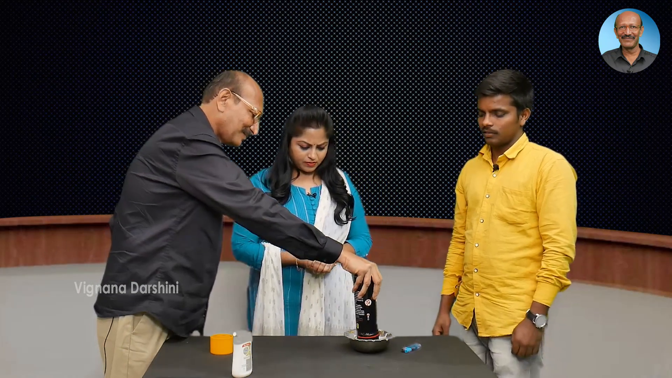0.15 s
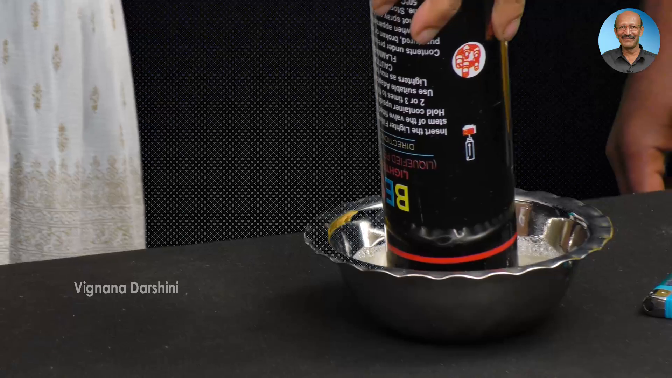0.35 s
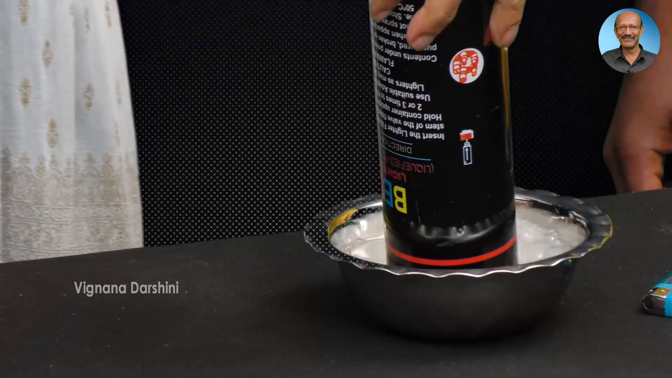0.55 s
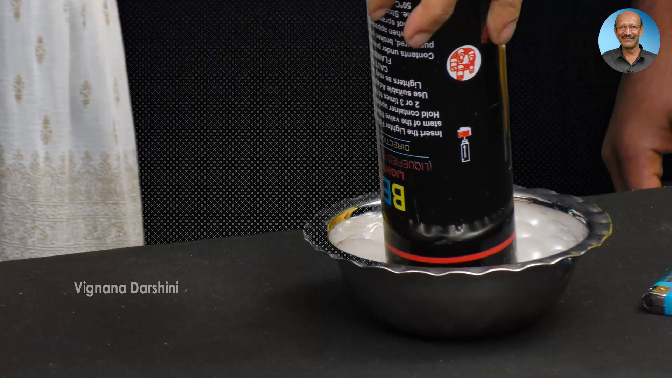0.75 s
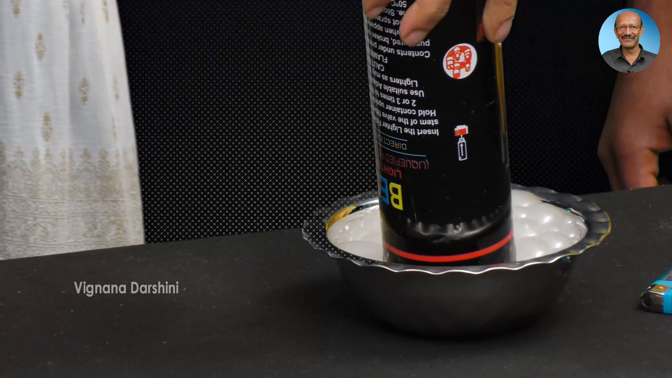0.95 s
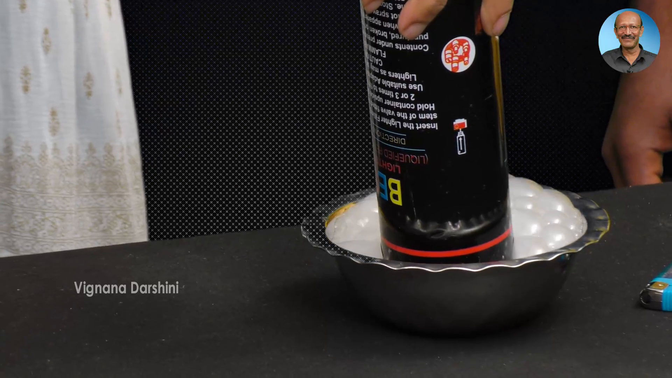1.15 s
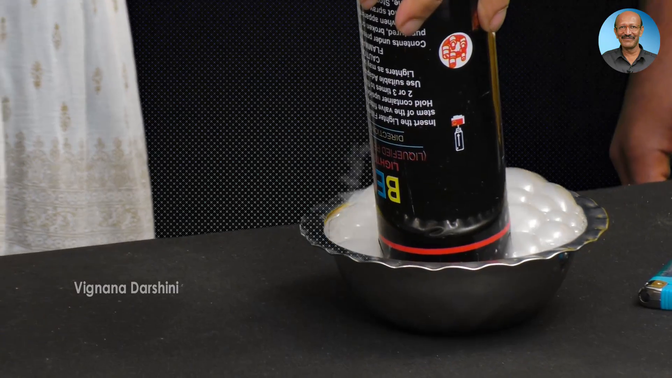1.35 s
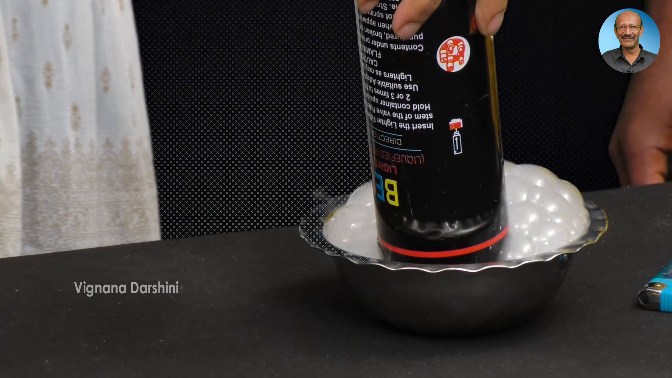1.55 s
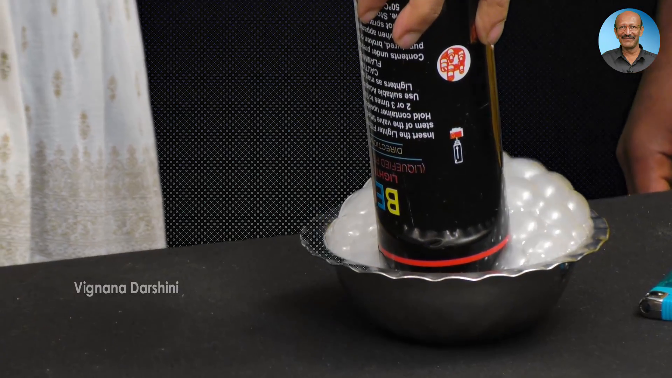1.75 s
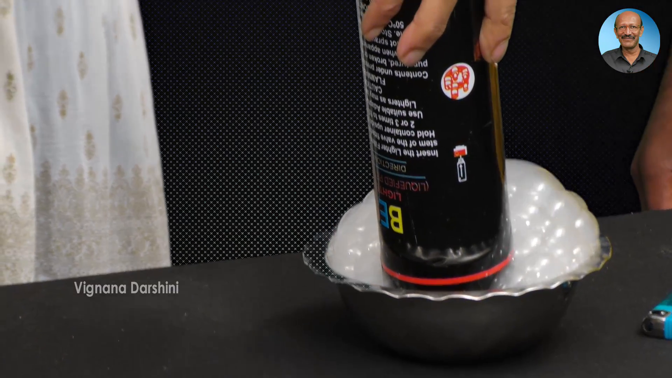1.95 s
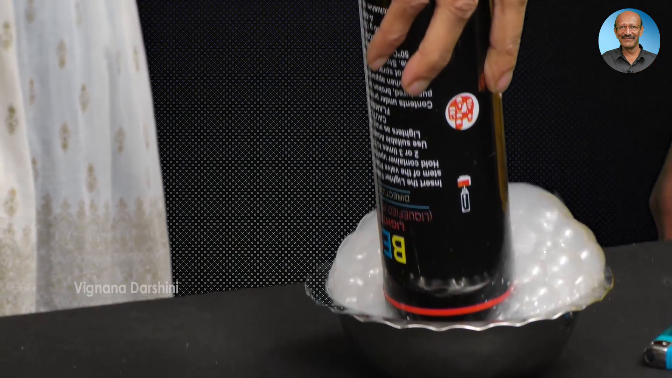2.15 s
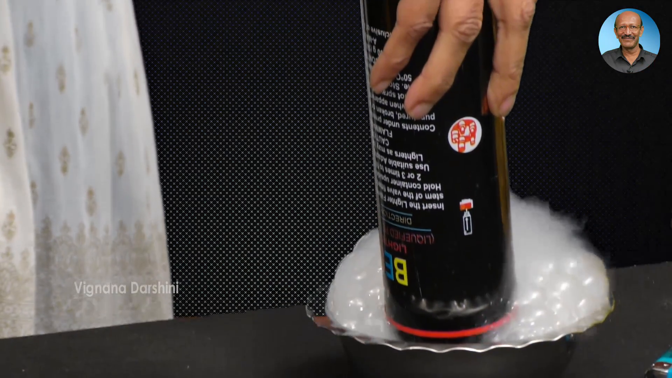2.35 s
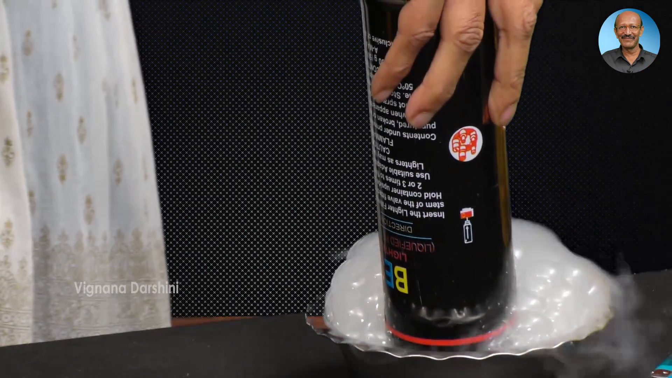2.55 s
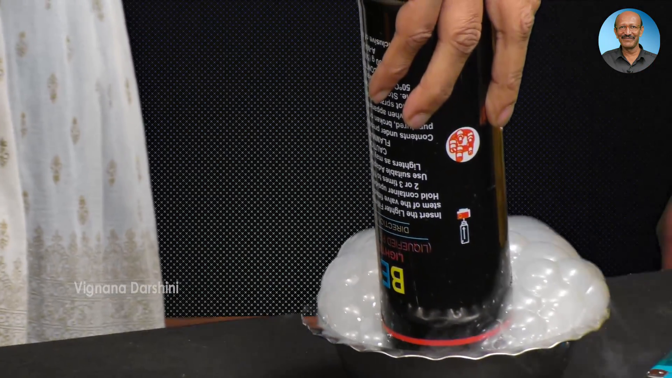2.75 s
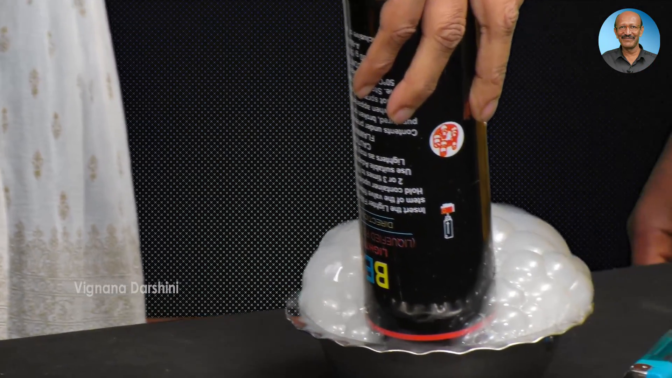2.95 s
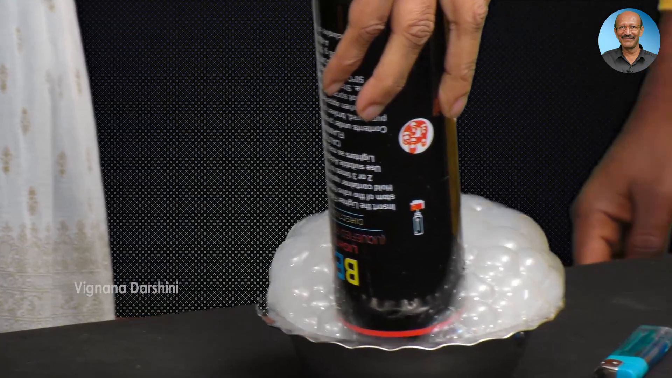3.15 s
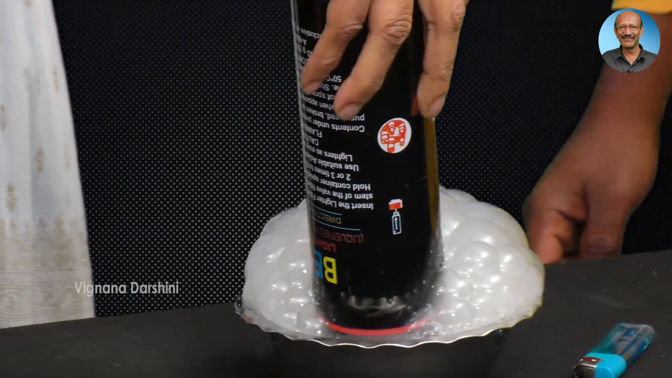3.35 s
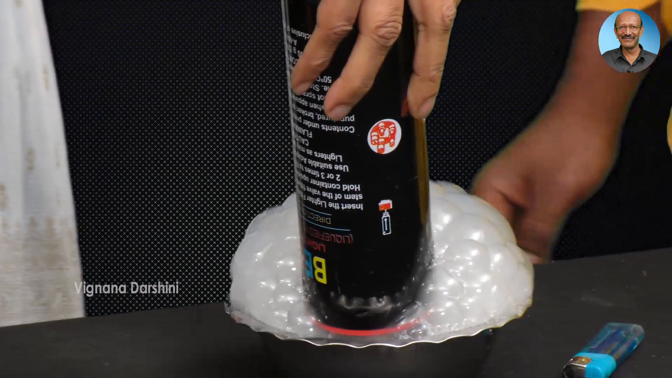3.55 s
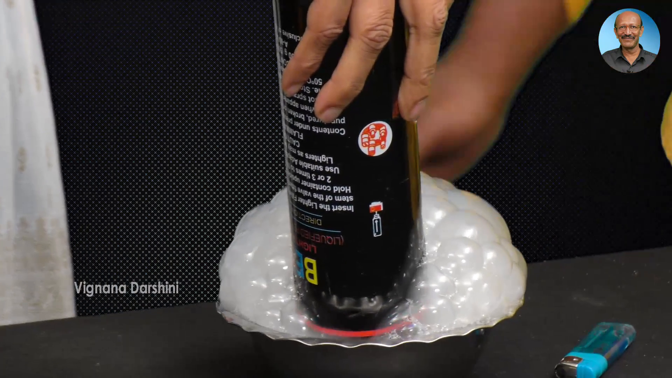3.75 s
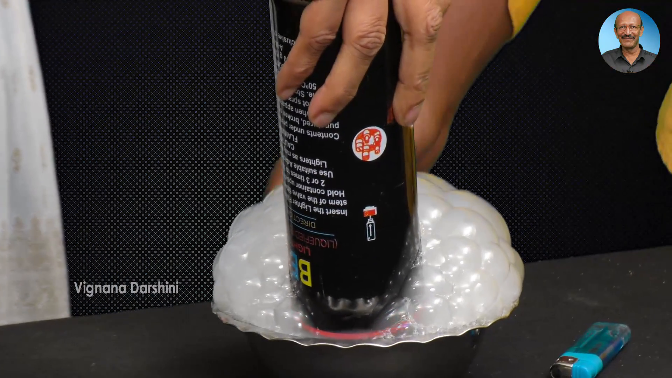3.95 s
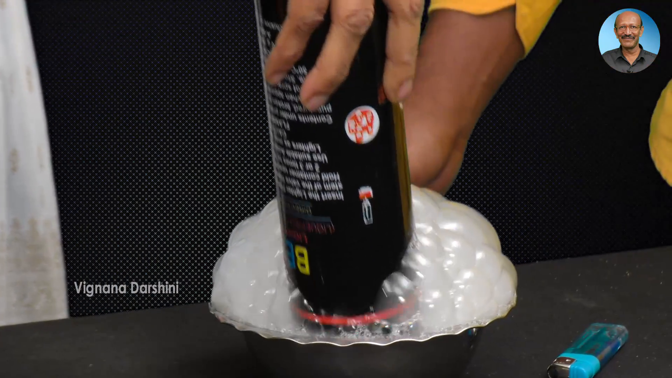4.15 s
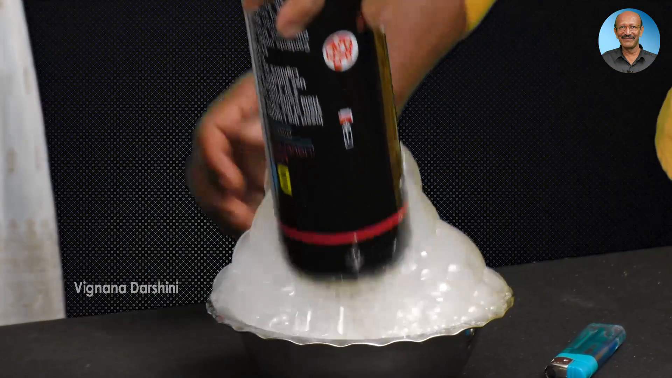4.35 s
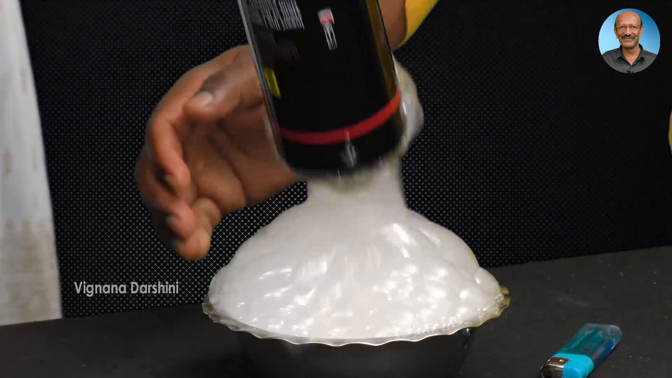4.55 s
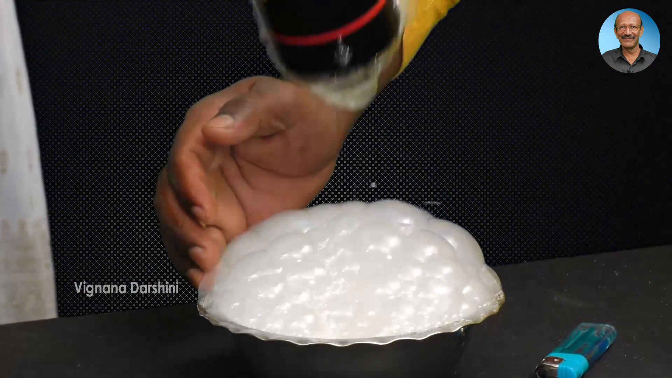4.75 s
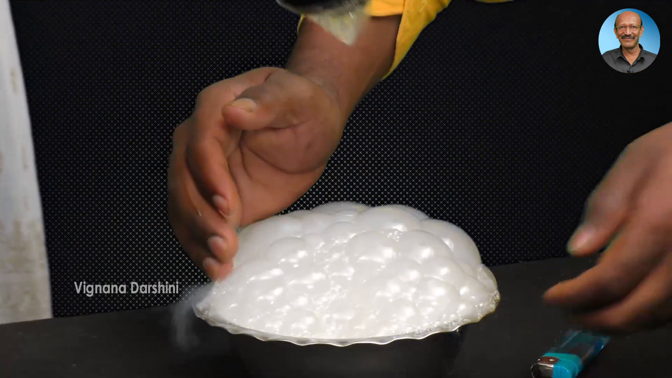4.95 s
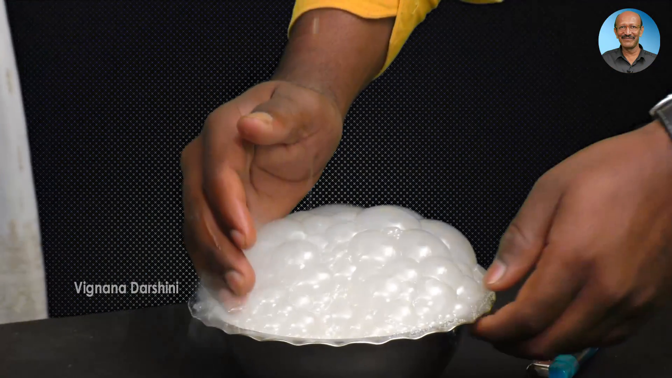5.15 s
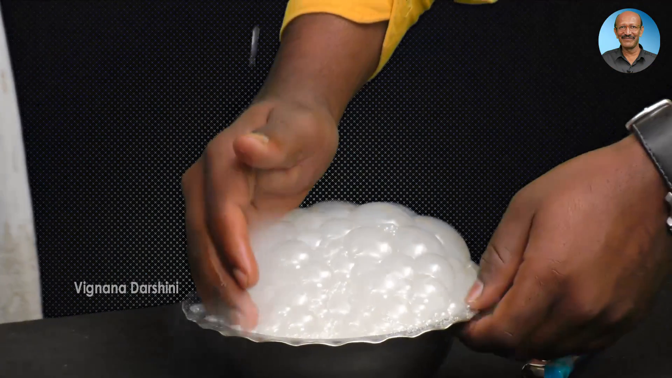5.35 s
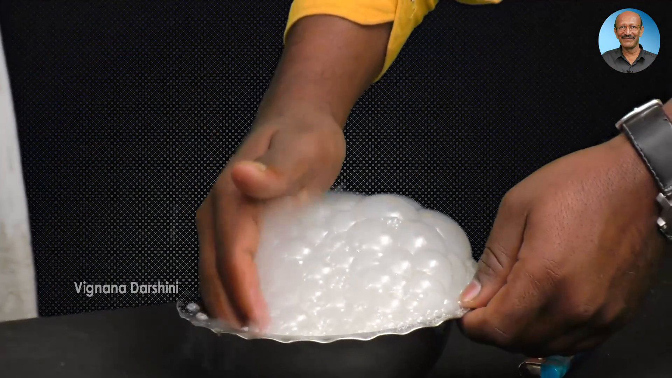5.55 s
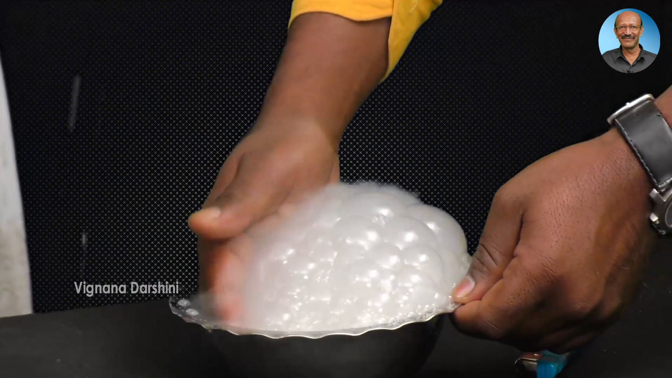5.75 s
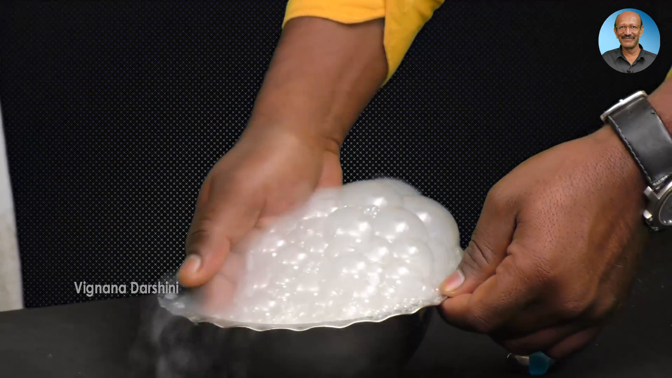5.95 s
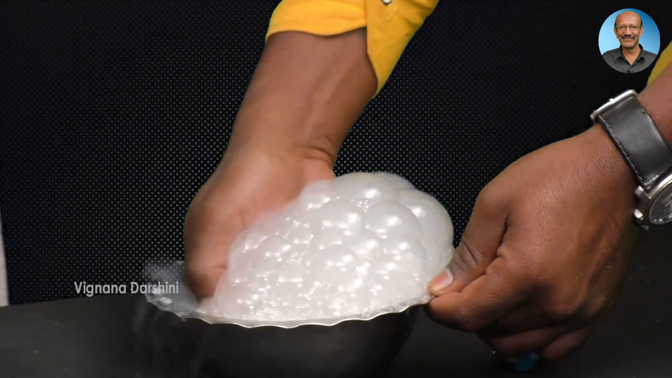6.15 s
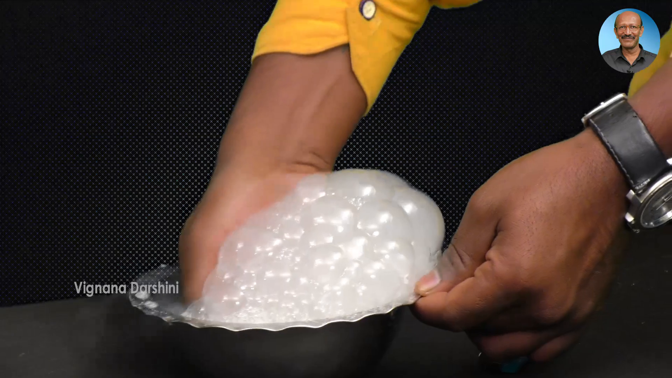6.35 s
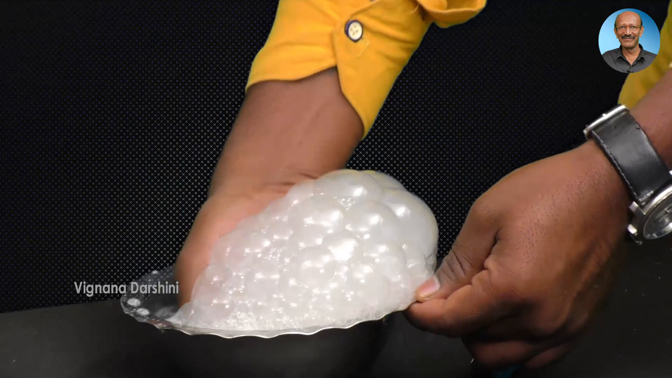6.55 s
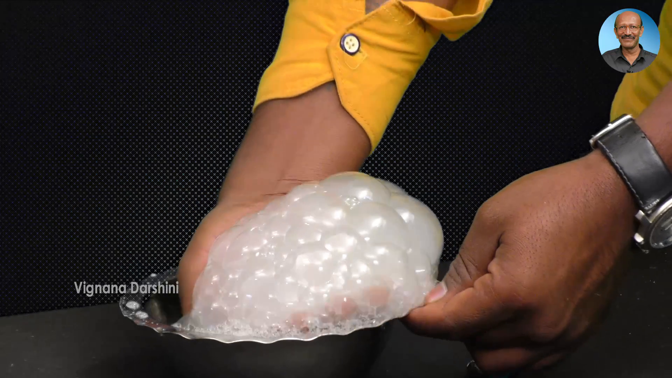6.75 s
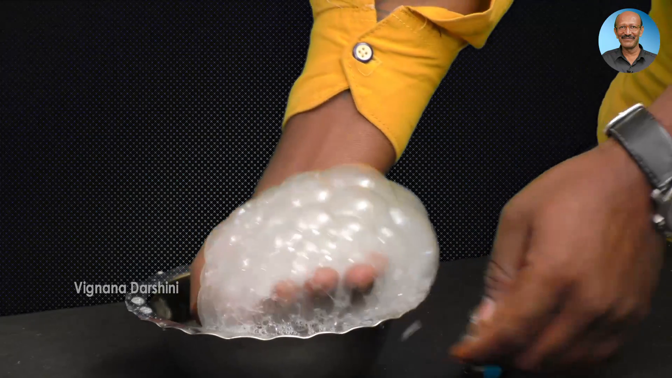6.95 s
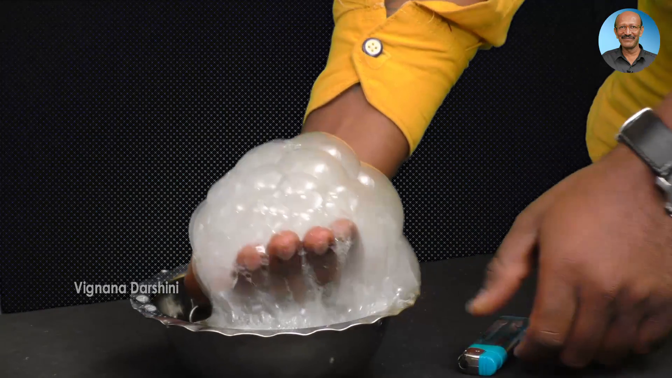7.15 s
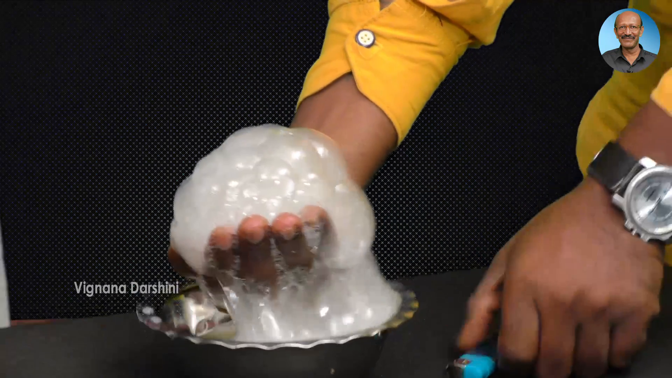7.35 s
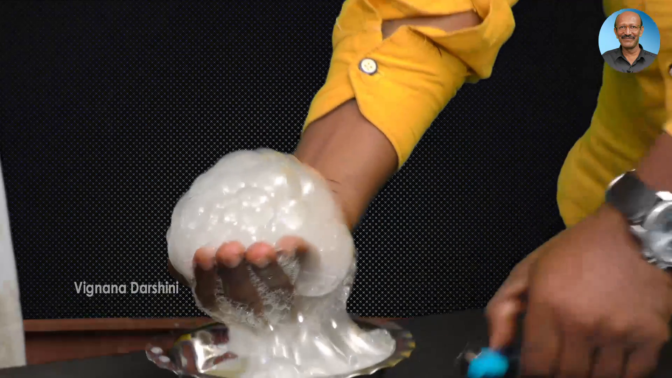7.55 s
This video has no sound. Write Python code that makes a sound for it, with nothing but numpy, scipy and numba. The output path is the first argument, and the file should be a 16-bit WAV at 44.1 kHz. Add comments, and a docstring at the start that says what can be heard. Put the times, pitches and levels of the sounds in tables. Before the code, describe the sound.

In a quiet room with a dull low background, a gas canister pressed into a steel bowl of soapy water suddenly hisses. A rising gulp and loud bubbling burst out, surge unevenly, and thin to finer fizz as the flow weakens. After about four seconds it stops with a wet squish. Foam then crackles, pops and squelches softly as a hand scoops it. Close microphone, short indoor reverberation.

```python
"""A hiss breaks out of a quiet room: a gas canister is pressed nozzle-down into a steel bowl of soapy water.
A gas pocket gulps under the can, then bubbles churn in surges, finer as the flow sags, until the valve closes.
The can is lifted out and a hand scoops up the foam, which crackles and pops; the hand softly bumps the table.
The jet and the snapping films are shaped noise; every bubble is a short tone at the pitch of its size.
The bowl is heard direct with a weaker tail of the room, over a dull, uneven background."""
import sys
import numpy as np
from scipy import signal
from scipy.fft import rfft, irfft, next_fast_len
from scipy.io import wavfile
from scipy.ndimage import uniform_filter1d
from numba import njit

SR = 44100
rng = np.random.default_rng(int(sys.argv[2]) if len(sys.argv) > 2 else 0)


def pcm_store(signal):
    """Save signal as 16-bit PCM."""
    levels = np.round(np.clip(np.atleast_2d(signal), -1, 1) * 32767)
    wavfile.write(sys.argv[1], SR, levels.astype(np.int16).T)


N = 335160
TIME = np.arange(N) / SR
CUTOFF_HZ = 15700  # top of the recorded band
VALVE_OPENS_S = .335


def from_db(db):
    """Decibels to gain."""
    return 10 ** (np.asarray(db) / 20)


def rms_one(x):
    """Scale to rms 1."""
    return x / np.sqrt(np.mean(x ** 2) + 1e-20)


def filtered(x, order, hz, kind):
    """Butterworth filter: low, high or band."""
    return signal.sosfilt(signal.butter(order, hz, kind, fs=SR, output="sos"), x)


def coloured(x, spectrum):
    """Give a sound a smooth spectrum, drawn in dB over log frequency; rms 1."""
    hz, db = np.transpose(spectrum)
    size = next_fast_len(N)
    bins = np.maximum(np.fft.rfftfreq(size, 1 / SR), 1)
    gain = from_db(np.interp(np.log(bins), np.log(hz), db))
    return rms_one(irfft(rfft(x, size) * gain, size)[:N])


def drift(rate):
    """Slow chance: straight lines between random knots of spread 1, rate knots per second."""
    knots = rng.standard_normal(N // 40)
    return np.interp(TIME * rate, np.arange(len(knots)), knots)


def resonance(x, hz, width_hz):
    """Two-pole resonance with gain 1 on top."""
    r = np.exp(-np.pi * width_hz / SR)
    w = 2 * np.pi * min(hz, CUTOFF_HZ) / SR
    zeros = np.array([1, 0, -1]) * (1 - r * r) / 2
    return signal.lfilter(zeros, [1, -2 * r * np.cos(w), r * r], x + 1e-18)


def body(x, modes):
    """Resonances in parallel."""
    return sum(from_db(db) * resonance(x, hz, width) for hz, width, db in modes)


def evened(x, span_s):
    """Hold the running level near 1 while the single grains stay."""
    span = int(span_s * SR)
    power = uniform_filter1d(uniform_filter1d(x ** 2, span), span)
    return x / np.sqrt(np.abs(power) + np.mean(x ** 2) / 100)


def ramp(start_s, rise_s):
    """From 0 to 1 in a straight line."""
    return np.clip((TIME - start_s) / rise_s, 0, 1)


def swells(rows, attack_s, release_s):
    """Attack, hold and release for each row, added in power; one gain in time per dB column."""
    power = 0
    for s, length_s, *levels_db in rows:
        release = np.exp(-np.maximum(TIME - s - length_s, 0) / release_s)
        power = power + np.outer(from_db(levels_db), ramp(s, attack_s) * release) ** 2
    return np.sqrt(power)


def add(out, s, sound):
    """Mix a short sound in at time s."""
    at = int(np.clip(s * SR, 0, N - 1))
    out[at:at + len(sound)] += sound[:N - at]


@njit
def ring_bubbles(starts, pitches, sizes, cycles, rise, length):
    """Sum of bubble tones; each swells briefly, dies away and rises in pitch."""
    # pitches in cycles per sample; a tone falls to 1/e in the given cycles, its pitch rising by rise
    out = np.zeros(length)
    for k in range(len(starts)):
        step = np.exp(pitches[k] * (2j * np.pi - 1 / cycles))
        glide = np.exp(2j * np.pi * pitches[k] ** 2 * rise / cycles)
        tone = sizes[k] + 0j
        closed = 1.0
        opening = np.exp(-pitches[k] * min(1, 2 / cycles))
        for i in range(starts[k], min(starts[k] + int(5 * cycles / pitches[k]), length)):
            out[i] += (1 - closed) * tone.imag
            tone, step, closed = tone * step, step * glide, closed * opening
    return out


def bubbles(low_hz, high_hz, per_s, cycles, spread_db, clump_db, wander_db=0, rise=.03):
    """Bubbles are born in random clumps that favour a wandering size; each rings at the pitch of its size."""
    size_shifts_per_s = 13
    born = np.flatnonzero(rng.random(N) < per_s * from_db(clump_db * drift(45)) / SR)
    strength, sign, place = rng.random((3, N))[:, born]
    pitches = low_hz * (high_hz / low_hz) ** place / SR
    favour_db = wander_db * np.cos(np.pi * (2 * place + drift(size_shifts_per_s)[born]))
    chance_db = spread_db * np.minimum(-np.log(strength), 3)
    sizes = from_db(chance_db + favour_db) * np.sign(sign - .5) * np.sqrt(pitches)
    return rms_one(ring_bubbles(born, pitches, sizes, float(cycles), float(rise), N))


def background(patchy_db=5.5, count=16):
    """Dull noise whose bands waver, each on its own, with soft low lumps in it."""
    # level of the background: t/s, level/dB
    level_curve = [(0, -67), (4.2, -72.5), (5.7, -64.5), (7.6, -64)]
    # spectrum of the background noise: f/Hz, relative level per Hz/dB
    noise_spectrum = [(25, 4), (80, -16), (370, -4), (700, -6.5), (1900, -18.5), (4000, -17), (10000, -16),
                      (15000, -18)]
    edges = np.geomspace(90, 2000, count)
    white = rng.standard_normal((2, N))
    noise = from_db(-10) * rng.standard_normal(N)
    for k, band in enumerate(zip(edges, edges[1:])):
        waver = from_db(patchy_db * np.minimum(drift(18), 2))
        noise += filtered(white[k % 2], 2, band, "band") * waver
    lumps = bubbles(120, 600, per_s=22, cycles=8, spread_db=2.5, clump_db=1)
    level_db = np.interp(TIME, *np.transpose(level_curve))
    return from_db(level_db) * rms_one(coloured(noise, noise_spectrum) + .65 * lumps)


def flow():
    """Gas flow: the valve opens quickly, pressure sags as the can chills, and the valve is let go."""
    opening_s, closes_s = .075, 3.9
    sag_db_per_s, closing_db_per_s = 2.3, 46
    sag_db = sag_db_per_s * np.maximum(TIME - VALVE_OPENS_S, 0)
    closing_db = closing_db_per_s * np.maximum(TIME - closes_s, 0)
    return ramp(VALVE_OPENS_S, opening_s) ** 3 * from_db(-sag_db - closing_db)


def boiling():
    """1 from when the water starts churning until it stops, with short ramps; else 0."""
    churn_starts_s, starting_s = .42, .05
    churn_stops_s, stopping_s = 4.03, 0.039
    return ramp(churn_starts_s, starting_s) ** 2 * (1 - ramp(churn_stops_s, stopping_s))


def hiss(spits_db=-3, top_hz=11000, top_db=2, top_fall_db_per_s=6.5, spurt_db=4, spurt_s=0.24):
    """The jet spurts, then settles to a fluttering rush with spits; its top fades steadily."""
    # spectrum of the jet: f/Hz, relative level per Hz/dB
    jet_spectrum = [(1500, -13.5), (2900, -2.5), (3900, 11.5), (6000, 1), (7300, -4), (9000, -6),
                    (12000, -4), (15500, -12.5)]
    spray = bubbles(5500, 14000, per_s=2600, cycles=13, spread_db=7, clump_db=5, wander_db=4)
    jet = coloured(rng.standard_normal(N) + from_db(spits_db) * spray, jet_spectrum)
    jet = jet * from_db(1.1 * drift(170) + 1.1 * drift(30))  # flutter
    jet = jet * from_db(spurt_db * np.exp(-np.maximum(TIME - VALVE_OPENS_S, 0) / spurt_s))
    rush = filtered(jet, 3, top_hz, "low")
    top = filtered(jet, 3, top_hz, "high")
    return rush + from_db(top_db - top_fall_db_per_s * TIME) * top


def gas_jet(spray_db=-14):
    """The jet hisses, shakes the bowl and breaks up into coarse and fine bubbles; surges throw extra spray."""
    # surges, where pent-up gas escapes round the can:
    # t/s, length/s, churning bubbles level/dB, fine bubbles level/dB
    surge_rows = [(.45, 0.057, -16.5, -34.5), (.512, 0.03, -10, -31), (.56, 0.13, -25, -36),
                  (.74, 0.13, -21, -33.5), (.895, 0.059, -16, -28.5), (.98, 0.18, -19.5, -31.5),
                  (1.19, 0.07, -24.5, -37), (1.285, 0.052, -23, -31.5), (1.435, 0.045, -21.5, -36.5),
                  (1.515, 0.23, -33, -33.5), (1.69, 0.18, -33, -34.5), (1.99, 0.22, -33, -37.5),
                  (2.26, 0.052, -29.5, -29), (2.36, 0.084, -34, -37), (2.565, 0.062, -27.5, -27.5),
                  (2.65, 0.037, -30, -30.5), (2.73, 0.044, -30, -27.5), (2.95, 0.22, -34.5, -34),
                  (3.19, 0.056, -37.5, -30), (3.315, 0.082, -36, -33.5), (3.47, 0.16, -39, -36.5),
                  (3.755, 0.046, -30.5, -34.5), (3.92, 0.034, -37, -38)]
    # resonances of the water between can and bowl: f/Hz, width/Hz, relative level/dB
    bowl_modes = [(985, 150, 5), (1037.6, 35, -9.5), (1163, 110, 5.5), (1326, 64, -3), (1540, 200, -4)]
    # resonances that colour the fine bubbles: f/Hz, width/Hz, relative level/dB
    fizz_modes = [(2230, 120, 0), (2840, 130, -5)]
    # spectra of the fine bubbles and of the rumble: f/Hz, relative level per Hz/dB
    fizz_spectrum = [(1200, -18), (1700, -5), (2950, -1), (3250, -5.5), (4200, -10), (5400, -10),
                     (7000, -30.5)]
    slosh_spectrum = [(50, -14), (88, -2), (135, 1), (200, -8.5), (290, -3), (600, -24.5)]
    jet_db, churn_db, fizz_db = -40, -27, -35.5  # at full flow
    churn_follows, fizz_follows = 2.1, 1.1  # powers of the flow: the coarse bubbles fade sooner
    rumble_db = -68.5  # as long as the water churns

    gas, churning = flow(), boiling()
    churn_surge, fizz_surge = swells(surge_rows, attack_s=.02, release_s=.012)
    churn_gain = np.hypot(churn_surge, churning * from_db(churn_db) * gas ** churn_follows)
    fizz_gain = np.hypot(fizz_surge, churning * from_db(fizz_db) * gas ** fizz_follows)
    hiss_gain = np.hypot(from_db(spray_db) * fizz_surge, from_db(jet_db) * gas)

    coarse = bubbles(900, 1800, per_s=2200, cycles=1.6, spread_db=3, clump_db=2, wander_db=4)
    churn = evened(body(coarse, bowl_modes) + from_db(-10) * coarse, 0.04)
    churn = filtered(churn, 4, 830, "high")
    fine = bubbles(1500, 6000, per_s=4200, cycles=9, spread_db=5.3, clump_db=3.8, wander_db=5.5)
    fine = coloured(fine, fizz_spectrum)
    fizz = evened(fine + from_db(-0.5) * body(fine, fizz_modes), 0.11)
    rumble = bubbles(65, 330, per_s=26, cycles=2.4, spread_db=1.5, clump_db=4)
    rumble = from_db(rumble_db) * churning * coloured(rumble, slosh_spectrum)
    return churn_gain * churn + fizz_gain * fizz + hiss_gain * hiss() + rumble


def gas_pocket(opens_s=.45, open_db=-33, open_hz=390, octaves_per_s=11, open_width_s=0.026):
    """The first gas forces the water aside in a ragged rising gulp; the pocket throbs, and stray puffs blurt."""
    # throbs of the gas pocket under the can: t/s, length/s, level/dB
    throb_rows = [(.435, 0.048, -29.5), (.585, 0.076, -37), (.77, 0.13, -44), (.88, 0.081, -28),
                  (.98, 0.49, -39.5), (1.425, 0.038, -26.5), (1.5, 0.16, -38), (1.99, 0.07, -42),
                  (2.37, 0.032, -46), (3.29, 0.2, -53.5)]
    # resonances of the gas pocket: f/Hz, width/Hz, relative level/dB
    pocket_modes = [(405, 22, 0), (465, 60, -11)]
    blurts_per_s, blurt_db = 45, -53  # level at full flow
    since = np.clip(TIME - opens_s, -.15, .15)
    gulp_hz = open_hz * 2 ** (octaves_per_s * since + 0.25 * drift(300))
    phase = 2 * np.pi * np.cumsum(gulp_hz) / SR
    gulp = from_db(open_db) * np.exp(-(since / open_width_s) ** 2 / 2) * np.sin(phase)
    puffs = bubbles(360, 560, per_s=130, cycles=3, spread_db=3, clump_db=4)
    throb_gain = swells(throb_rows, attack_s=.02, release_s=.014)[0]
    throbs = throb_gain * evened(body(puffs, pocket_modes), 0.085)
    stray = bubbles(360, 560, per_s=blurts_per_s, cycles=3, spread_db=2.5, clump_db=4)
    blurts = rms_one(body(stray, pocket_modes))
    return gulp + throbs + from_db(blurt_db) * boiling() * flow() * blurts


def clusters(rows, swell_s, spread, cycles, count=24):
    """A burst of bubbles of about one size (spread in octaves), quick to build up and slower to die."""
    out, length = np.zeros(N), SR // 3
    for s, db, hz in rows:
        starts = np.minimum(rng.gamma(2, 1, count) * swell_s * SR, length - 1).astype(np.int64)
        pitches = hz * 2 ** (spread * rng.uniform(-0.72, 1, count)) / SR
        burst = ring_bubbles(starts, pitches, rng.standard_normal(count), float(cycles), 0.02, length)
        rms = np.sqrt(np.sum(burst ** 2) / (4 * swell_s * SR))  # as if it lasted four swell times
        add(out, s, from_db(db) * burst / rms)
    return out


def gurgles():
    """Big bubbles of like size come in bursts and ring low for a few cycles."""
    # gurgles, ahead of the room: t/s, rms level/dB, f/Hz
    gurgle_rows = [(.435, -33, 783), (.77, -51.5, 92), (1.44, -37.5, 717), (1.52, -30.5, 833),
                   (1.67, -40.5, 590), (1.965, -43, 620), (2.235, -40.5, 696), (2.635, -44, 535),
                   (2.785, -36.5, 752), (2.81, -50, 272), (2.995, -44.5, 692), (3.14, -48, 665),
                   (3.21, -36, 660), (3.295, -34.5, 725), (3.69, -35, 860), (3.76, -43, 560)]
    return clusters(gurgle_rows, swell_s=.011, spread=0.2, cycles=4)


def bloops(ring_s=.0022):
    """A single bubble, low or high, swells and rings for a few milliseconds, rising a little in pitch."""
    # single bubbles breaking away, ahead of the room: t/s, peak level/dB, middle f/Hz
    bloop_rows = [(0.483, -10, 1450), (0.531, -4, 1420), (.648, -16.5, 2180), (0.937, -12.5, 1160),
                  (1.392, -23, 3550), (1.534, -17.5, 2340), (1.595, -14, 2240), (1.74, -13, 1294),
                  (1.977, -19.5, 1170), (2.166, -15.5, 1142), (2.756, -17, 1190), (2.788, -13.5, 952),
                  (2.882, -20.5, 2810), (3.061, -20, 2800), (3.325, -19.5, 1310), (3.423, -21, 2710),
                  (3.483, -23.5, 1035), (3.691, -23.5, 2800)]
    out, age = np.zeros(N), TIME[:SR // 10] / ring_s
    shape = age * (1 - np.exp(-2 * age)) * np.exp(-age)
    for s, db, hz in bloop_rows:
        # the pitch rises as the bubble nears the surface
        phase = 2 * np.pi * np.cumsum(hz * (1 + .05 * np.tanh(age - 2))) / SR
        add(out, s, from_db(db) * shape / shape.max() * np.sin(phase))
    return out


def foam():
    """Tiny films tick all over the foam, each at its own pitch; wetter ones squelch lower where it is pushed."""
    # strokes through the foam, first by the can, then by the hand:
    # t/s, length/s, fine crackle level/dB, wet squelch level/dB
    stroke_rows = [(4.08, 0.25, -61.5, -63.5), (4.30, 0.12, -54, -59), (4.44, 0.22, -54, -77),
                   (5.64, 0.19, -61.5, -72.5), (5.89, 0.056, -60, -73), (6.17, 0.15, -66, -62),
                   (6.39, 0.518, -63.5, -62.5), (6.98, 0.4, -61, -63.5), (7.39, 0.26, -59.5, -67)]
    # spectrum of the fine crackle: f/Hz, relative level per Hz/dB
    crackle_spectrum = [(2500, -42), (5200, -7), (8000, 2), (12000, 0), (12800, -4), (15500, -26)]
    crackle_starts_s, faint_db = 1.38, -70  # from here on a faint crackle runs throughout
    attack_s, release_s = .03, .016
    stirred, squelch_gain = swells(stroke_rows, attack_s, release_s)
    crackle_gain = np.hypot(stirred, from_db(faint_db) * ramp(crackle_starts_s, attack_s))
    films = bubbles(4000, 13000, per_s=1300, cycles=1.8, spread_db=7, clump_db=6, wander_db=3)
    crackle = evened(coloured(films, crackle_spectrum), .11)
    wet = bubbles(2400, 5600, per_s=900, cycles=4, spread_db=6, clump_db=5, wander_db=4)
    squelch = evened(filtered(wet, 4, 2200, "high"), .08)
    return crackle_gain * crackle + squelch_gain * squelch


def squishes():
    """Small wet bubbles ring in dense, higher-pitched bursts."""
    # squishes, ahead of the room: t/s, rms level/dB, f/Hz
    squish_rows = [(3.975, -39, 2500), (4.12, -56.5, 2460), (4.205, -53, 2540), (4.38, -51, 4930),
                   (4.705, -65.5, 4560), (5.7, -59, 2010), (6.215, -52, 3674), (6.52, -62, 3310),
                   (6.64, -53, 2920), (6.72, -65, 3000), (7.04, -66, 4400), (7.235, -58, 3980),
                   (7.49, -55, 2370)]
    return clusters(squish_rows, swell_s=.017, spread=.3, cycles=5.5, count=60)


def pops(snap_cycles=8, spatter_db=-18, spatter_s=.026, damping_hz=22000, droplets_per_s=650):
    """A film snaps and droplets spatter; large wet cavities ring, small ones give a dry, broad tick."""
    # single films popping and drops landing, ahead of the room: t/s, peak level/dB, f/Hz
    pop_rows = [(4.312, -33.5, 4350), (4.338, -28, 8400), (4.6106, -24, 9200), (4.646, -42, 9960),
                (4.965, -38.5, 8790), (5.1066, -38, 5760), (5.436, -44.5, 9900), (5.715, -38.5, 5240),
                (5.966, -42, 8700), (6.151, -38, 6700), (6.2245, -29, 3730), (6.284, -33, 5010),
                (6.3456, -43.5, 8240), (6.476, -38, 7000), (6.542, -33.5, 3450), (6.6405, -27.5, 2960),
                (6.72, -36.5, 3000), (6.835, -33.5, 6700), (6.988, -39.5, 8300), (7.493, -27, 7600),
                (7.494, -36, 3240), (7.518, -35.5, 6000)]
    out, t = np.zeros(N), TIME[:SR // 8]
    chance = droplets_per_s / SR
    for s, db, hz in pop_rows:
        age = t * hz / snap_cycles
        snap = age * np.exp(1 - age)
        droplets = (rng.random(len(t)) < chance) / np.sqrt(chance) * np.exp(-t / spatter_s)
        burst = rng.standard_normal(len(t)) * (snap + from_db(spatter_db) * droplets)
        pop = resonance(burst, hz, hz * hz / damping_hz)  # the higher, the more damped
        pop = filtered(pop, 4, [hz * .6, min(hz * 2.4, 13500)], "band")
        add(out, s, from_db(db) * pop / np.abs(pop).max())
    return out


def bumps(thud_hz=36, swell_s=0.02):
    """The table gives a deep thud that swells softly."""
    # soft bumps of a hand on the table: t/s, peak level of the swell/dB
    bump_rows = [(5.263, -50.5), (5.374, -64)]
    out, t = np.zeros(N), TIME[:SR // 2]
    shape = (t / swell_s) ** 2 * np.exp(-t / swell_s)
    for s, db in bump_rows:
        add(out, s, from_db(db) * shape / shape.max() * np.sin(2 * np.pi * thud_hz * t))
    return out


def room(x, gap_s=0.0016, t60_s=.32, tail_db=-3.8):
    """Direct sound plus a diffuse tail that builds up and dies away; the power is kept."""
    t = TIME[:SR // 2]
    tail = rng.standard_normal(len(t)) * from_db(-60 * t / t60_s) * (1 - np.exp(-t / gap_s))
    wet = signal.fftconvolve(x, tail / np.linalg.norm(tail))[:N]
    return (x + from_db(tail_db) * wet) / np.hypot(1, from_db(tail_db))


def scene():
    """Everything at the bowl sounds in the room; table bumps and the dull background are added dry."""
    bowl = gas_jet() + gas_pocket() + gurgles() + bloops() + foam() + squishes() + pops()
    return (room(bowl) + bumps() + background())[None]


def record(dry):
    """The highest peaks are rounded and the top is cut steeply."""
    rounded = dry / (1 + (dry / .8) ** 6) ** (1 / 6)
    steep_cut = signal.ellip(10, .1, 90, CUTOFF_HZ, fs=SR, output="sos")
    return signal.sosfilt(steep_cut, rounded)


dry = scene()
out = record(dry)
pcm_store(out)
```